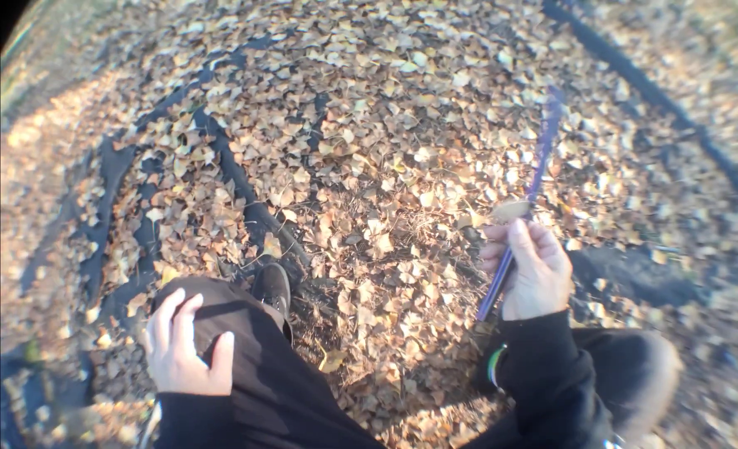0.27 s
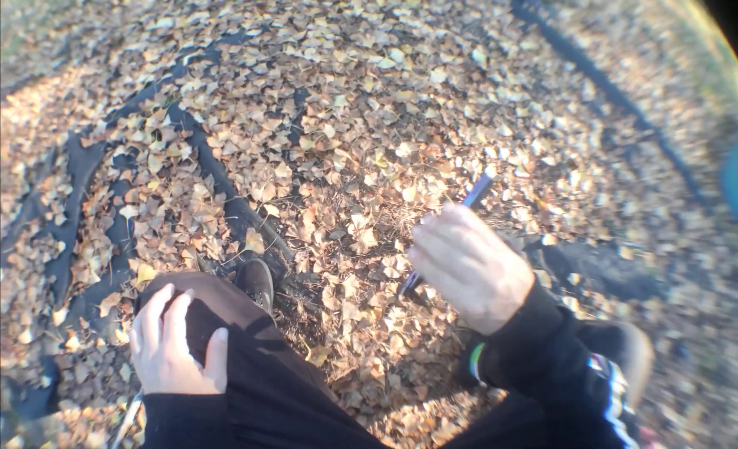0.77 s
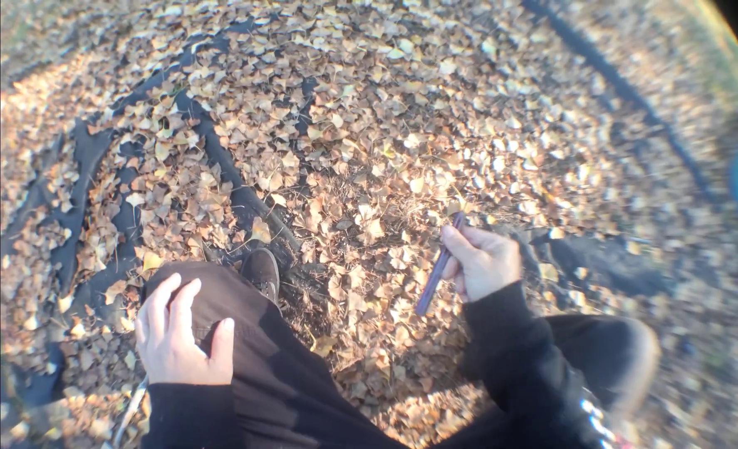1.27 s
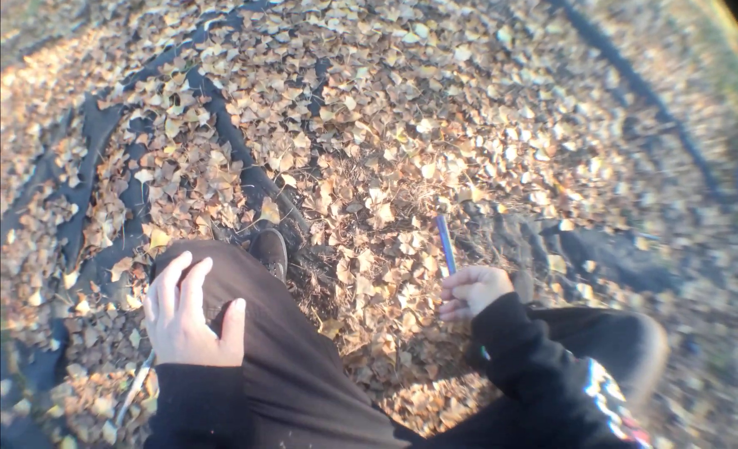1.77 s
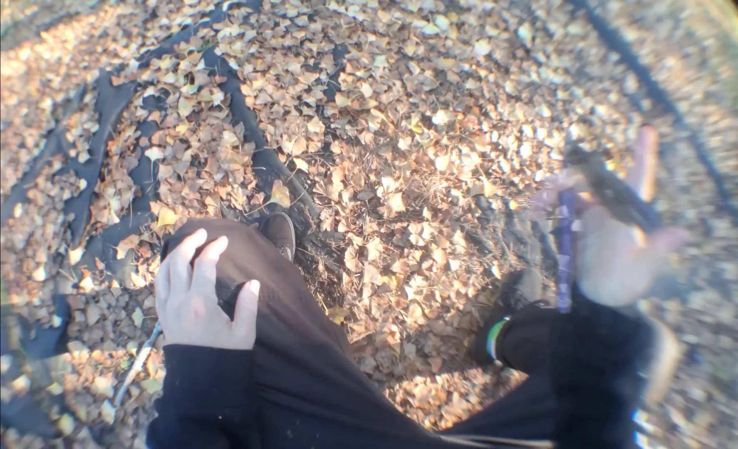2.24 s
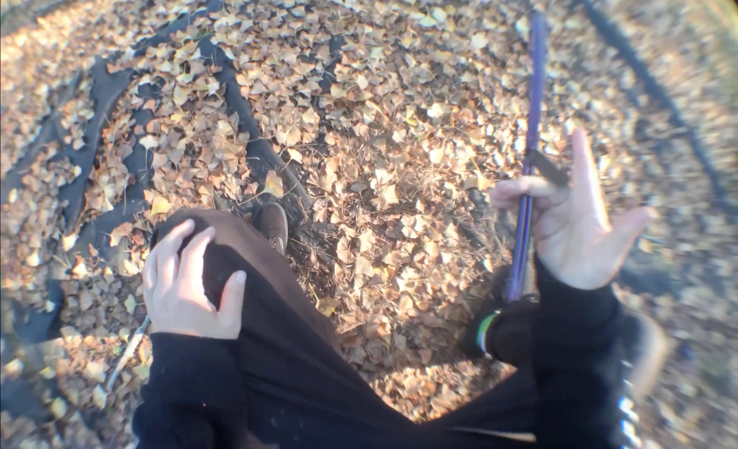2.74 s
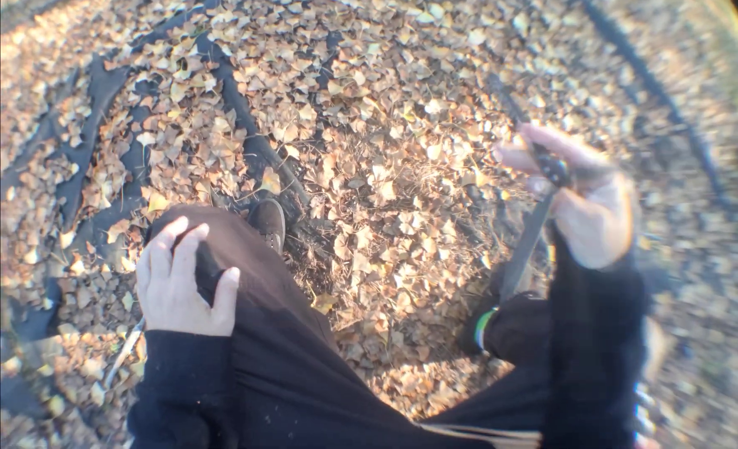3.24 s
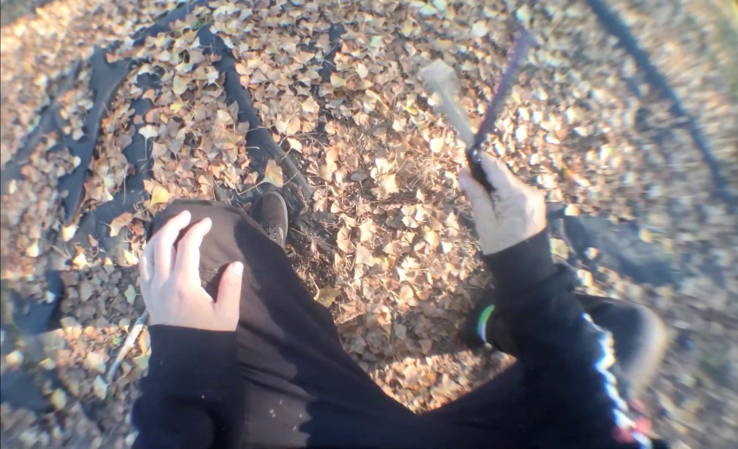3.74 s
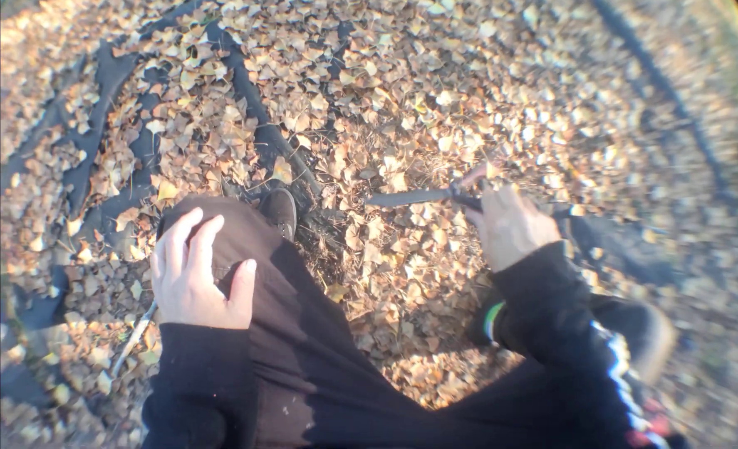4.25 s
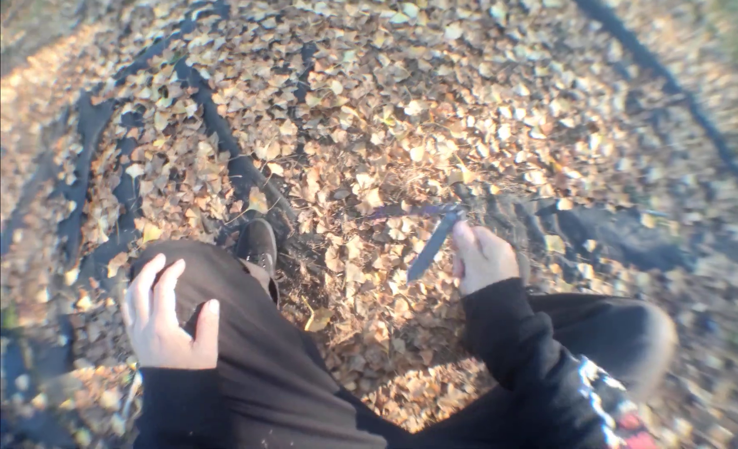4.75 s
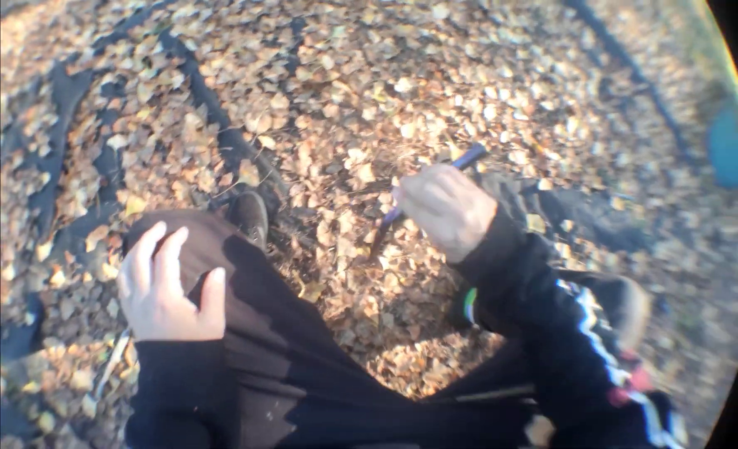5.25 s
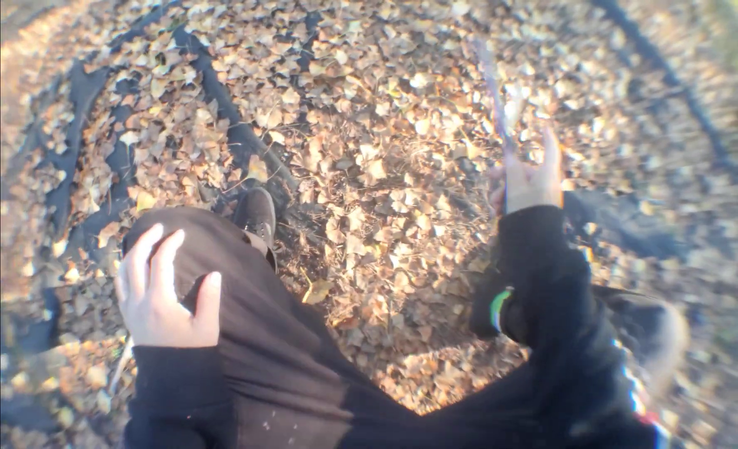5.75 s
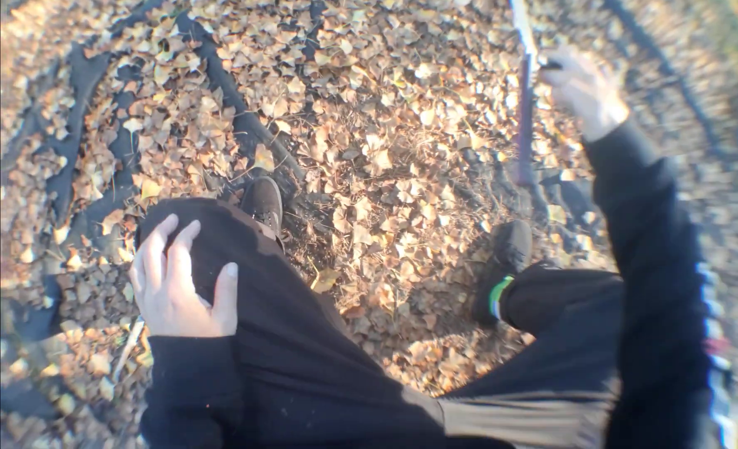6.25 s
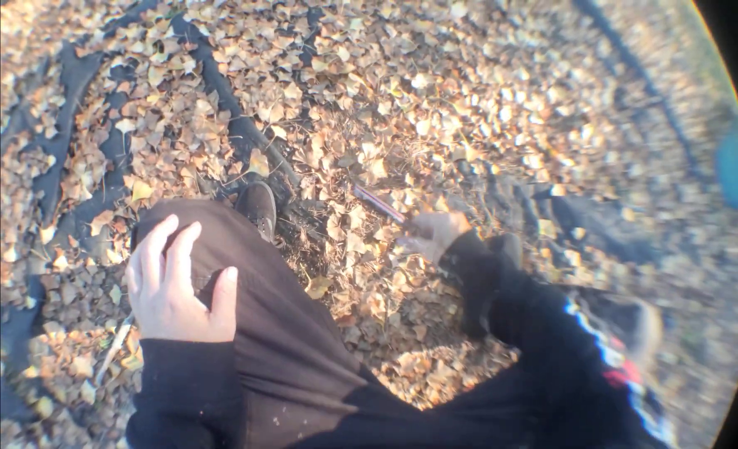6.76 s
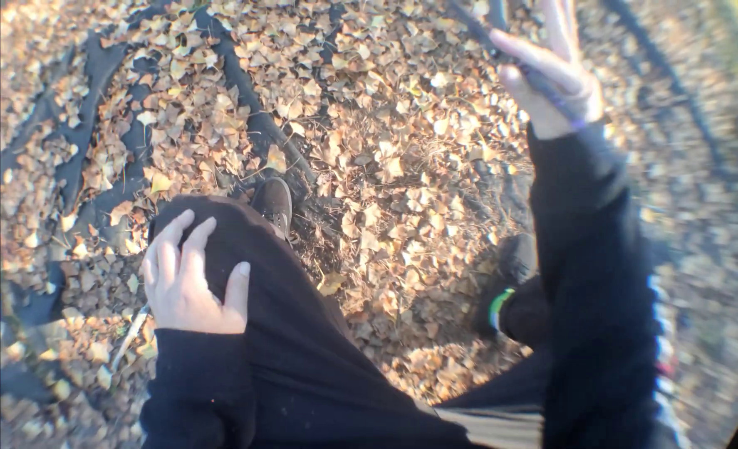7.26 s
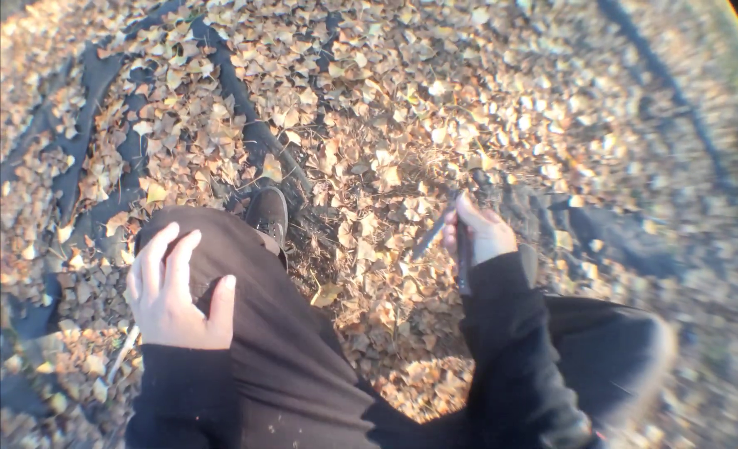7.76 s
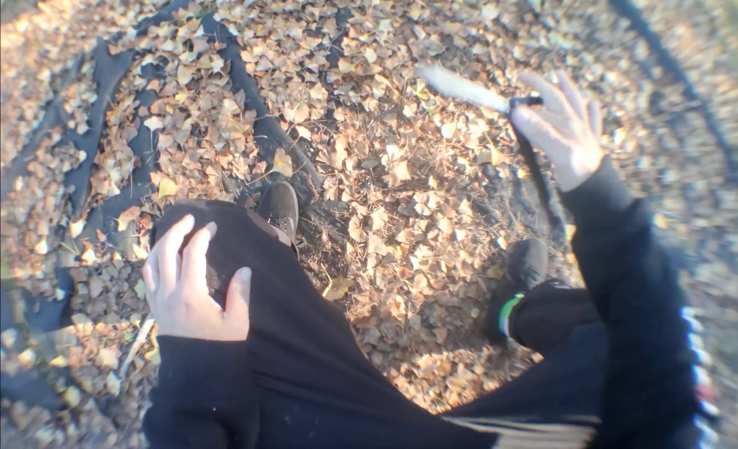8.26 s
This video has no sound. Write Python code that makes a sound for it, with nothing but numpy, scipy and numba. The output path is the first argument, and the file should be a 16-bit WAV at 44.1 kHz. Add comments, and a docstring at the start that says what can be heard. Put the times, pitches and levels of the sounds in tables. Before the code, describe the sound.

Sharp, dry metallic clacks of a folding knife flipped open and shut, irregularly spaced, with tiny bounces, over soft outdoor wind and sleeve rustle.

```python
"""Outdoors, wind buffets two microphone ports on a chest over cloth rustle and a faint hiss: flickering noise.
The sleeve swishes in gliding noise bands; a folding knife half a metre away clacks and bounces as damped modes
excited by noise bursts, and lap and trees answer with decaying noise. Scrapes are brief narrow noise bands.
From the second second a far engine, one sine climbing in pitch, carries now and then.
From the fifth second a low drone of narrow-band noise swells at times."""
import sys
import numpy as np
from scipy import signal
from scipy.fft import rfft, irfft
from scipy.io import wavfile
from scipy.ndimage import uniform_filter1d
from numba import njit

SR = 44100
rng = np.random.default_rng(int(sys.argv[2]) if len(sys.argv) > 2 else 0)


def inscribe(sig):
    """Save sig as 16-bit PCM at rate SR to the path in sys.argv[1].

    A 1-D sig is mono; a 2-D sig holds one channel per row.
    Samples are clipped to [-1, 1] before scaling.
    """
    pcm = np.round(np.clip(np.atleast_2d(sig).T, -1, 1) * 32767)
    wavfile.write(sys.argv[1], SR, pcm.astype(np.int16))


N = 375732  # samples in the scene
FFT_SIZE, BLOW_SIZE = 385024, 2048  # samples in a long noise and in one blow
OCTAVE = np.log2(np.arange(FFT_SIZE // 2 + 1) * SR / FFT_SIZE + 1e-3)  # log2 of Hz at each FFT bin

# Wind pressure on the ports. Each row: time in seconds, level in dB before the gusts.
WIND_LEVEL = [(0.0, -72), (0.19, -61.5), (1.14, -69.5), (1.44, -66.5), (1.47, -59.5), (1.73, -73),
              (2.23, -65), (2.63, -72), (3.39, -72.5), (3.51, -64.5), (4.58, -74), (4.7, -66.5),
              (5.29, -73.5), (5.53, -55), (5.55, -46.5), (5.86, -71), (6.0, -58), (6.53, -69.5), (7.1, -63),
              (8.0, -65.5), (8.35, -59.5), (8.52, -64.5)]
# Spectrum of the wind. Each row: frequency in Hz, relative density in dB.
WIND_COLOUR = [(15, -45.5), (25, -4), (92, 3), (156, 1), (263, -13), (348, -31), (400, -36), (520, -51.5),
               (880, -120)]
GUST_DB, GUSTS_PER_S = 4.5, 9  # spread of the random gust levels, and how many are drawn a second
# Soft treble rustle. Each row: time in seconds, level in dB before its flicker.
RUSTLE_LEVEL = [(0.0, -71.5), (0.16, -74), (0.66, -79.5), (1.04, -75.5), (2.23, -81), (2.54, -75.5),
                (2.85, -90), (3.56, -87.5), (3.82, -80), (4.79, -86), (4.96, -77.5), (5.38, -86),
                (5.65, -69.5), (5.86, -77.5), (6.83, -83.5), (6.98, -76), (7.47, -84.5), (8.52, -84.5)]
# Spectrum of the rustle. Each row: frequency in Hz, relative density in dB.
RUSTLE_COLOUR = [(1200, -19.5), (2300, 2), (4000, 4), (6000, -10), (9000, -6), (13000, -6), (16000, -21)]
# Spectrum of the hiss. Each row: frequency in Hz, relative density in dB.
HISS_COLOUR = [(150, -34), (250, -5.5), (679, -14), (1110, -16), (1840, -17.5), (4200, -20), (12000, -23),
               (13400, -36), (14900, -17.5), (16500, -50.5)]
HISS_DB = -80
# Narrow bands within the hiss. Each row: centre in Hz, width in Hz, level in dB before slow swells.
HISS_BANDS = [(228, 28, -74.5), (1122, 85, -78.5), (2356, 140, -94.5), (3120, 48, -90.5), (3460, 74, -92.5),
              (3797, 160, -89.5), (4260, 50, -91), (14500, 650, -95.5)]
# Sleeve swishes. Each row: middle in seconds, length in seconds, centre in Hz, level in dB at the middle.
SLEEVE_SWISHES = [(0.316, 0.51, 480, -71.5), (1.086, 0.69, 400, -66), (1.35, 0.18, 600, -65),
                  (1.563, 0.35, 320, -66.5), (1.8, 0.27, 500, -72.5), (2.431, 0.21, 320, -65.5),
                  (2.74, .3, 330, -70.5), (3.176, 0.28, 380, -70.5), (3.877, .3, 370, -66.5),
                  (4.12, 0.18, 460, -68.5), (4.309, 0.098, 330, -66.5), (4.458, 0.085, 580, -70),
                  (4.868, 0.18, 340, -75.5), (5.088, 0.16, 620, -68), (5.568, 0.33, 320, -64),
                  (5.748, .1, 300, -69.5), (6.122, .12, 500, -72), (6.33, 0.34, 350, -69.5),
                  (6.55, 0.21, 345, -66.5), (6.874, 0.12, 320, -69.5), (7.019, 0.16, 600, -69.5),
                  (7.298, .15, 340, -78), (7.801, 0.2, 470, -61.5), (8.042, 0.18, 400, -69.5)]
SLEEVE_REST_DB = -90.5
# Modes of handles and blade in the hand, plus a ring near 1.1 kHz that sounds with every blow. Each row:
# nominal frequency in Hz, relative level in dB, # base decay time to -60 dB in seconds.
KNIFE_MODES = [(380, 17.5, 0.008), (564.6, 16, 0.009), (840, 12.5, 0.0099), (1115, 7, 0.028),
               (1459.6, 4, 0.01), (2060, 10.5, 0.0023), (2476, 11.5, 0.0065), (2949, 10, 0.0064),
               (3060, 7, 0.002), (3664, 17, 0.0042), (5180, 14.5, 0.0045), (5630, 8, 0.0068),
               (5949, 6.5, 0.012), (6334, 7.5, 0.0081), (7185, 13.5, .006), (7735, 9, 0.014),
               (8680, 14.5, 0.0024), (9674, 3.5, 0.012), (12870, 7.5, 0.0043), (14000, 4.5, 0.0028),
               (14370, 10, 0.0067), (14200, 7.5, .004)]
# Handle blows. Each row: time in seconds, strength in dB, then in dB relative to it the thud, 1 kHz ring,
# low, middle, upper and top modes; then strongest low pitch in Hz, left minus right in dB.
HANDLE_BLOWS = [(0.1935, -10.5, -29, -38, -21, -23, -11, -28, 2510, -2.5),
                (0.823, -53, -29, -9, -2, -15, -16.5, -21, 2930, -3),
                (0.9197, -16.5, -20.5, -41, -16.5, -11.5, -9.5, -23, 2950, -2.5),
                (0.9379, -15, -25, -33, -19.5, -20, -19, -25, 2760, 1),
                (1.2526, -6, -36.5, -25, -17.5, -15, -20, -20.5, 2290, -0.5),
                (1.2904, -10, -38.5, -21.5, -18, -19.5, -18.5, -18, 2814, 0),
                (1.7636, -22.5, -31, -44, -12.5, -21, -13.5, -25, 2740, -1),
                (1.8301, -33.5, -30, -42, -6.5, -29, -18, -30.5, 2416, 0),
                (2.2878, -11.5, -30.5, -32.5, -12.5, -15.5, -13.5, -22, 3150, -5),
                (2.3132, -10, -25, -31, -17, -18, -11.5, -23.5, 2560, -3),
                (2.595, -20, -56.5, -22.5, -9.5, -22.5, -17, -15.5, 2467, 2),
                (3.1148, -15.5, -35, -35, -15, -20, -16, -24, 2642, 0),
                (3.6099, -20, -39, -26, -16.5, -22, -27, -21.5, 2433, -0.5),
                (4.032, -57, -30, -31.5, -16, -2.5, -31, -46.5, 2465, -6),
                (4.0873, -14, -27.5, -38.5, -23, -23, -17, -30.5, 2990, -2.0),
                (4.3923, -14.5, -34, -31.5, -15.5, -17.5, -21.5, -22.5, 3310, 0.0),
                (4.7768, -15.5, -36, -43, -17, -21.5, -10.5, -45, 2510, 0.5),
                (5.0256, -8.5, -37.5, -30.5, -20.5, -17, -19, -26.5, 2970, 0),
                (5.3168, -61.5, -30, -19, 9.5, -12, -34.5, -43, 2066, -0.5),
                (5.4149, -16.5, -28.5, -42.5, -20.5, -18.5, -18, -24.5, 2950, -2.5),
                (5.667, -10, -42.5, -31.5, -20, -24.5, -20.5, -27, 3140, -0.5),
                (6.095, -15, -26, -42.5, -17, -22, -23, -32, 2945, -0.5),
                (6.7956, -20, -62, -37, -17, -24, -27.5, -24.5, 2576, 3),
                (6.8494, -32.5, -45, -25, -14.5, -26.5, -13.5, -23.5, 2520, -1),
                (7.2208, -34, -47.5, -44.5, -12.5, -28, -12.5, -21.5, 2610, -3),
                (7.9785, -24, -25, -64, -13, -15.5, -17.5, -26, 3124, -2),
                (8.4249, -28, -52, -31, -12.5, -26.5, -11, -23.5, 2400, 0)]
# Bounces, each with the colour and side of the blow before it. Each row: time in seconds, strength in dB.
HANDLE_BOUNCES = [(0.2188, -16), (1.308, -9.5), (1.3174, -19.5), (1.3219, -17), (2.3423, -18), (2.365, -23),
                  (2.619, -19.5), (2.6349, -26), (2.6462, -32), (3.144, -24.5), (3.6246, -26.5),
                  (3.6329, -32.5), (4.4079, -18), (5.0477, -11), (5.0621, -16), (5.0707, -17),
                  (5.0752, -25), (5.4424, -23), (5.6815, -17), (5.6895, -16), (6.863, -41)]
HIGH_DB, UNDER_DB = -18.5, -11  # 7.5 kHz relative to strength, 1.6 kHz relative to the low modes
PING_DB, PING_LONGER = 1, 1.6  # the strongest low mode stands out and rings longer
EVEN = 0.76  # summed over all directions, blows differ less in dB than at the ports
# Scrapes and rubs of handles, fingers and cloth. Each row: start in seconds, length in seconds,
# centre in Hz, width in Hz, level in dB before swell and flicker.
RUBS = [(0.736, 0.1, 770, 80.4, -80), (3.547, 0.17, 1616, 110, -65), (3.85, 0.16, 2350, 200, -78.5),
        (3.852, 0.15, 4260, 401, -82.5), (5.315, 0.076, 1540, 70, -70.5), (5.729, 0.17, 7430, 4000, -68.5),
        (6.294, 0.17, 605, 78.3, -78.5), (6.43, 0.079, 712, 80, -79.5), (6.301, 0.3, 2405, 199, -84),
        (6.948, 0.2, 4200, 1980, -71.5), (7.721, 0.15, 1290, 247.6, -70)]
# Stretches where the engine carries. Each row: start in seconds, end in seconds, level in dB before wavering.
ENGINE_STRETCHES = [(1.064, 1.335, -65), (1.35, 1.708, -68), (2.627, 2.902, -73.5), (2.961, 3.212, -68),
                    (3.255, 3.415, -75)]
ENGINE_HZ, CLIMB_HZ_PER_S, BEND_HZ_PER_S2 = 243, 62, -6  # mean pitch and rise at 1 s; quadratic bend
# Low drone in the gusts. Each row: start in seconds, length in seconds, centre in Hz, width in Hz,
# level in dB before swell and flicker.
DRONE_SWELLS = [(4.66, 0.37, 121, 61, -62), (5.5, 0.34, 111, 70.6, -49), (6.62, 0.18, 128.2, 50, -60.5),
                (6.97, 0.51, 118.8, 48.3, -56.5), (8.04, 0.62, 115, 49.6, -55.5)]
# Resonances behind the ports. Each row: port (0 left, 1 right), centre in Hz, width in Hz, boost in dB.
PORT_RESONANCES = [(0, 7716, 3700, 3.5), (1, 5533, 1383, 6), (1, 14370, 2498, 2)]
TOP_HZ = 16500


def undb(db):
    """Level law: amplitude gain is ten to the power of dB over 20."""
    return np.exp(np.asarray(db) * np.log(10) / 20)


def curve(table):
    """Linear interpolation: a table of times and values gives a value at every sample."""
    return np.interp(np.arange(N) / SR, *np.transpose(table))


def wander(rate):
    """Random modulation: normal values drawn at a rate per second are joined by straight lines."""
    count = int(N / SR * rate) + 2
    return np.interp(np.arange(N) * rate / SR, np.arange(count), rng.standard_normal(count))


def mix_ports(mid, side, alike):
    """Partial coherence: common and opposed noise give two ports a correlation of alike."""
    return np.sqrt(1 + alike) * mid + np.sqrt(1 - alike) * side * np.array([[1], [-1]])


def pair(alike):
    """Partial coherence in frequency: spectra of two white noises that share a part."""
    mid, side = rfft(rng.standard_normal((2, FFT_SIZE)))
    return mix_ports(mid, side, alike)


def coloured(colour, alike, flicker_db, rate):
    """Spectral shaping: white noise is weighted by colour, its octaves flicker apart, and its rms is set to 1."""
    hz, db = np.transpose(colour)
    spectrum = pair(alike) * undb(np.interp(OCTAVE, np.log2(hz), db, left=-99, right=-99))
    out = 0
    for centre in np.arange(np.floor(np.log2(hz[1])) - 1, np.log2(hz[-2]) + 1):
        band = np.clip(1 - np.abs(OCTAVE - centre), 0, 1)  # overlapping triangles
        octave_noise = irfft(spectrum * band, FFT_SIZE)[:, :N]
        out = out + octave_noise * undb(flicker_db * wander(rate))
    return out / np.sqrt(np.mean(out ** 2))


def band_pass(x, hz, width):
    """Selective filtering: a Butterworth filter keeps a band, scaled to a standard deviation of 1."""
    edges = [hz - width / 2, hz + width / 2]
    y = signal.sosfilt(signal.butter(2, edges, "band", fs=SR, output="sos"), x)
    return y / np.std(y)


def wind():
    """Turbulent pressure: mostly bass noise, nearly alike at both ports, gusts at random."""
    level = undb(curve(WIND_LEVEL) + GUST_DB * wander(GUSTS_PER_S))
    return level * coloured(WIND_COLOUR, .92, 2.0, 35)


def rustle():
    """Diffuse friction: treble noise, almost unrelated between the ports, follows a level curve."""
    return undb(curve(RUSTLE_LEVEL)) * coloured(RUSTLE_COLOUR, 0.05, 0.68, 7.9)


def hiss():
    """Stationary noise: a fixed broad spectrum whose octaves flicker about a constant mean."""
    return undb(HISS_DB) * coloured(HISS_COLOUR, 0.16, 2.4, 6)


def whistles(swell_db=3.0):
    """Narrow-band noise: each band of one white noise swells and fades slowly."""
    noise = rng.standard_normal((2, N))
    return sum(band_pass(noise, hz, width) * undb(db + swell_db * wander(1.1)) for hz, width, db in HISS_BANDS)


@njit
def moving_band_pass(x, hz, sharp):
    """State-variable resonance: two integrators pass a moving band with gain 1 at its centre."""
    y, band, low, damping = np.empty(len(x)), 0., 0., 1 / sharp
    for i in range(len(x)):
        g = np.tan(np.pi * hz[i] / SR)
        v = (band + g * (x[i] - low)) / (1 + g * (g + damping))
        band, low, y[i] = 2 * v - band, low + 2 * g * v, damping * v
    return y


def swish(hz, sharp=1.9, alike=.75, flicker_db=2.5):
    """Resonant filtering: two equal filters in series shape the rush of cloth and air in a gliding band."""
    noise = irfft(pair(alike), FFT_SIZE)[:, :N]
    out = np.array([moving_band_pass(moving_band_pass(x, hz, sharp), hz, sharp) for x in noise])
    # a higher centre has a wider band, so more power: even it out
    return out / np.std(out) * np.sqrt(np.mean(hz) / hz) * undb(flicker_db * wander(14))


def sleeve():
    """Power addition: overlapping sweeps of the arm add as cosine-squared powers while the band glides."""
    t = np.arange(N) / SR
    power = undb(2 * SLEEVE_REST_DB)
    for middle, length, _, db in SLEEVE_SWISHES:
        arch = np.cos(np.pi * np.clip((t - middle) / length, -.5, .5)) ** 2
        power = power + undb(2 * db) * arch
    centre_hz = curve([(middle, hz) for middle, _, hz, _ in SLEEVE_SWISHES])
    return np.sqrt(power) * swish(centre_hz)


def clacks():
    """Excitation spectra: blows and bounces become time, strength, log-frequency points, their dB, and side."""
    rows = list(HANDLE_BLOWS)
    for s, db in HANDLE_BOUNCES:
        blow = [row for row in HANDLE_BLOWS if row[0] < s][-1]
        rows.append((s, db, *blow[2:]))
    out = []
    for s, db, thud, ring, low, middle, upper, top, low_hz, pan in rows:
        bands = np.log([550, 1130, 1600, low_hz, 3850, 5500, 7500, 13000])
        colour = [thud, ring, low + UNDER_DB, low, middle, upper, HIGH_DB, top]
        out.append((s, db, bands, colour, pan))
    return out


def ringing(peak_db, bands, colour, push_cycles=0.62, scatter_db=2.0, detune=0.029):
    """Modal superposition: damped sines ring in a random mix of constant nominal energy."""
    t = np.arange(BLOW_SIZE) / SR
    mode_hz, db, mode_t60 = np.transpose(KNIFE_MODES)[:, :, None]
    level_chance, sign_chance, pitch_chance = rng.standard_normal((3, len(db), 1))
    # the grip pulls the nearest low mode to the pitch of this blow
    ping = np.arange(len(db))[:, None] == np.argmin(np.abs(np.log(mode_hz) - bands[3]))
    hz = np.where(ping, np.exp(bands[3]), mode_hz * (1 + detune * pitch_chance))
    t60 = mode_t60 * np.where(ping, PING_LONGER, 1)
    even_gain = undb(peak_db + db + np.interp(np.log(hz), bands, colour) + PING_DB * ping)
    mix = even_gain * undb(scatter_db * level_chance * ~ping)
    gain = mix * np.sqrt(np.sum(even_gain ** 2 * t60) / np.sum(mix ** 2 * t60))
    onset = (1 - np.exp(-t * hz / push_cycles)) ** 2  # push_cycles: onset in periods of the mode
    decay = np.exp(-np.log(1000) * t / t60)
    return np.sum(np.sign(sign_chance) * gain * onset * decay * np.sin(2 * np.pi * hz * t), axis=0)


def contact_noise(chatter_s=.0011, apart=0.98, apart_hz=1500, lap_db=-16.5, lap_t60=0.032):
    """Impact chatter: faces meet at many points in quick turn; hands and lap scatter a decaying tail."""
    t = np.arange(BLOW_SIZE) / SR
    # weight of what differs between the ports rises with frequency
    treble = 1 - np.exp(-np.arange(BLOW_SIZE // 2 + 1) * SR / BLOW_SIZE / apart_hz)
    touch = np.sqrt(t / chatter_s) * np.exp(-(t / chatter_s) ** 2)
    lap = undb(lap_db) * np.clip(t / chatter_s, 0, 1) * 1000. ** (-t / lap_t60)
    both, *own = rfft(rng.standard_normal((3, BLOW_SIZE)) * touch)
    lap_both, *lap_own = rfft(rng.standard_normal((3, BLOW_SIZE)) * lap)
    contact = both + (1 - treble) * lap_both + treble * (apart * np.array(own) + np.array(lap_own))
    # flatten it broadly: the modes, not the chatter, set the colour
    return contact / np.sqrt(uniform_filter1d(np.abs(contact) ** 2, size=14))


def knife(crack_db=27):
    """Source and resonator: contact noise convolves with modes and a broad crack, for two ports and the trees."""
    lead, lag = 128, 3  # samples: room before the blow, and delay at the left port
    out = np.zeros((3, N + BLOW_SIZE))
    log_hz = OCTAVE[::FFT_SIZE // BLOW_SIZE][:BLOW_SIZE // 2 + 1] * np.log(2)
    for s, peak_db, bands, colour, pan_db in clacks():
        ring = ringing(peak_db, bands, colour)
        crack = undb(peak_db + crack_db + np.interp(log_hz, bands, colour))  # fills between the modes
        sound = np.roll(irfft((rfft(ring) + crack) * contact_noise()), lead, axis=1)
        sound = sound * undb(np.array([[pan_db], [-pan_db]]) / 2)
        at = int(s * SR) - lead
        out[0, at + lag:at + BLOW_SIZE] += sound[0, :-lag]  # the right port is nearer
        out[1, at:at + BLOW_SIZE] += sound[1]
        out[2, at:at + BLOW_SIZE] += sound[1] * undb((EVEN - 1) * peak_db)  # what goes out to the trees
    return out[:, :N]


def snaps(level_db, thin_hz):
    """Impulse excitation: the first crack of each blow, over all directions, is a high-passed click."""
    out = np.zeros(N)
    s, peak_db = np.transpose([row[:2] for row in clacks()])
    out[(s * SR).astype(int)] = undb(EVEN * peak_db + level_db)
    return signal.lfilter(*signal.butter(2, thin_hz, "high", fs=SR), out)


def echoes(x, level_db, t60, start_s, dull_hz):
    """Diffuse reverberation: x convolves with dulled, decaying noise, drawn anew for each port."""
    t = np.arange(int(1.4 * t60 * SR)) / SR
    tail = rng.standard_normal((2, len(t))) * 1000. ** (-t / t60) * np.clip(t / start_s, 0, 1) ** 2
    tail = signal.lfilter(*signal.butter(1, dull_hz, fs=SR), tail)
    tail = tail * undb(level_db) / np.sqrt(np.sum(tail ** 2, axis=1, keepdims=True))
    return signal.oaconvolve(x, tail, axes=1)[:, :N]


def trees(sent):
    """Scattering: the knife's outgoing sound and its first cracks return as a diffuse tail."""
    source = undb(-17.5) * sent + snaps(0.0, 560.0)
    return echoes(source[None], -17.5, t60=.42, start_s=.01, dull_hz=3500.)


def bursts(table, alike):
    """Windowed noise: brief sounds, each in one band, swell unevenly and fade."""
    out = np.zeros((2, N))
    for s, length, hz, width, db in table:
        at = int(s * SR)
        n = min(int(length * SR), N - at)
        mid, side = rng.standard_normal((2, SR))[:, :n]
        noise = band_pass(mix_ports(mid, side, alike), hz, width)
        out[:, at:at + n] += undb(db) * noise * np.sqrt(np.hanning(n))
    return out * undb(3.8 * wander(25))


def scrapes():
    """Friction: handles, fingers and cloth rub in short noise bands that differ between the ports."""
    return bursts(RUBS, 0.2)


def engine(waver_db=2.0, fade_s=.05):
    """Frequency modulation: one order of a far engine climbs ever slower, unsteady in pitch and level."""
    t = np.arange(N) / SR
    gain = 0
    for start, end, db in ENGINE_STRETCHES:
        gain = gain + undb(db) * np.clip(np.minimum(t - start, end - t) / fade_s, 0, 1)
    mean_hz = ENGINE_HZ + CLIMB_HZ_PER_S * (t - 1) + BEND_HZ_PER_S2 * (t - 1) ** 2
    hz = mean_hz * (1 + .02 * wander(40))
    tone = np.sin(2 * np.pi * np.cumsum(hz) / SR)
    return np.sqrt(2) * gain * undb(waver_db * wander(2.1)) * tone


def drones():
    """Narrow-band noise: low bands, nearly alike at both ports, swell and fade."""
    return bursts(DRONE_SWELLS, .93)


def scene():
    """Superposition: wind, cloth, knife with its echoes, and far sounds add linearly."""
    background = wind() + rustle() + hiss() + whistles()
    cloth = sleeve()
    *clack, sent = knife()
    return background + cloth + np.array(clack) + trees(sent) + scrapes() + engine() + drones()


def record(dry):
    """Resonance and saturation: each port lifts its treble bands, loud peaks round off, and the top is cut."""
    lifted = np.array(dry)
    for port, hz, width, db in PORT_RESONANCES:
        k = round(port)
        lifted[k] += (undb(db) - 1) * signal.lfilter(*signal.iirpeak(hz, hz / width, fs=SR), lifted[k])
    rounded = .85 * np.tanh(lifted / .85)
    return signal.sosfilt(signal.ellip(10, .2, 70, TOP_HZ, fs=SR, output="sos"), rounded)


dry = scene()
out = record(dry)
inscribe(out)
```